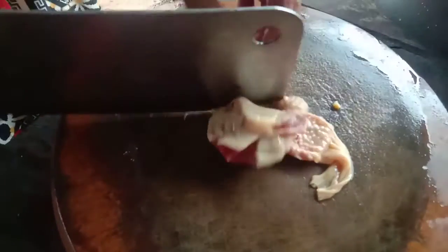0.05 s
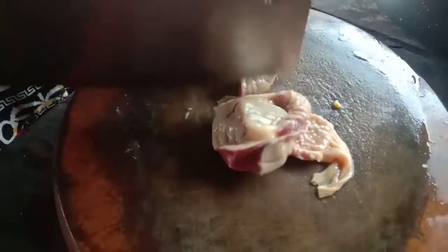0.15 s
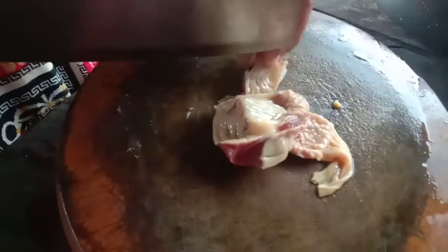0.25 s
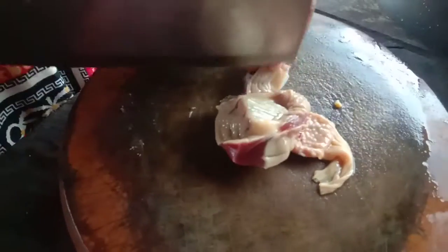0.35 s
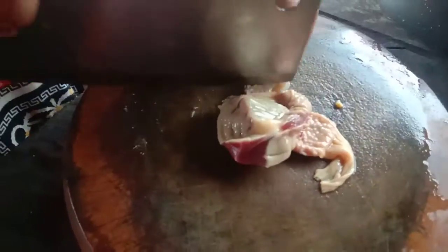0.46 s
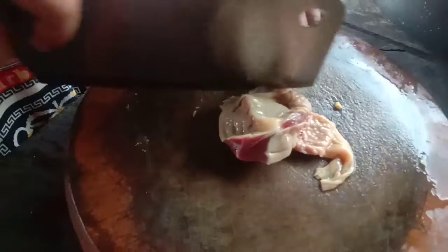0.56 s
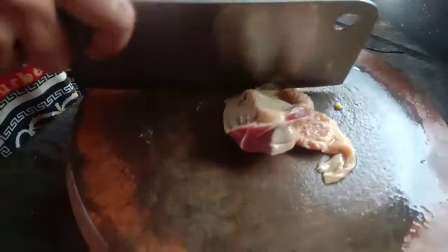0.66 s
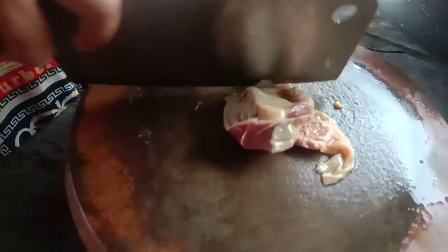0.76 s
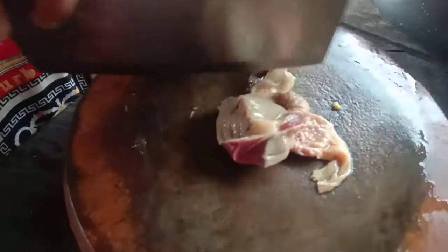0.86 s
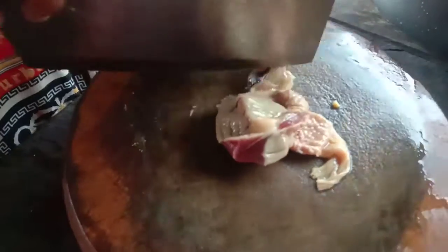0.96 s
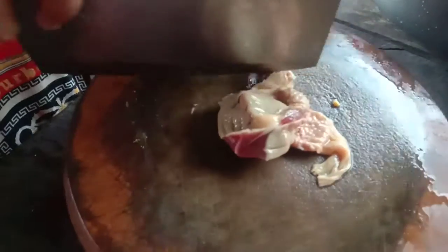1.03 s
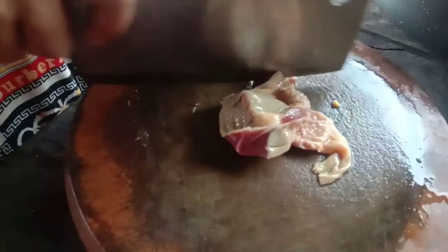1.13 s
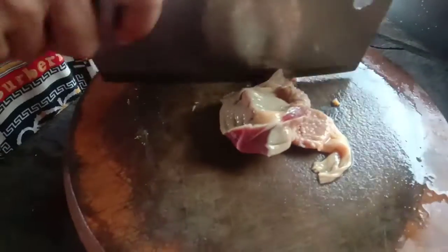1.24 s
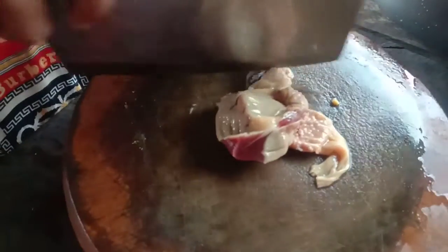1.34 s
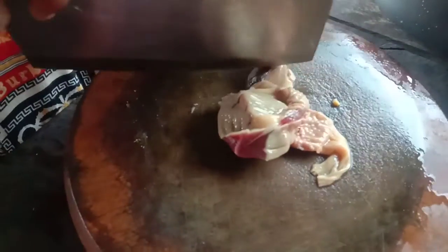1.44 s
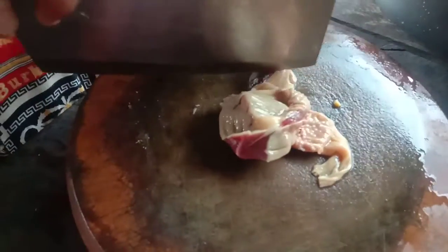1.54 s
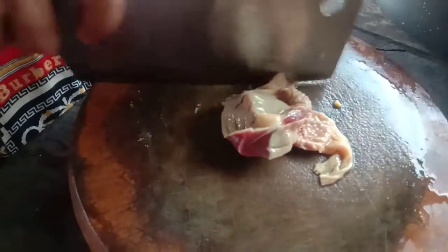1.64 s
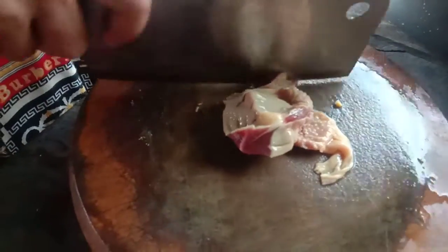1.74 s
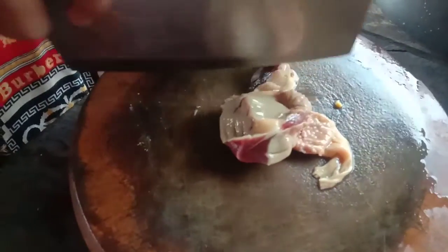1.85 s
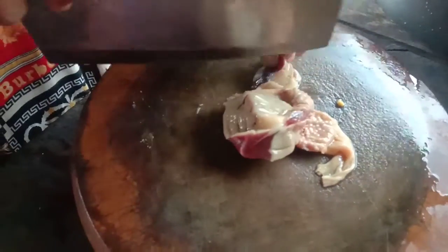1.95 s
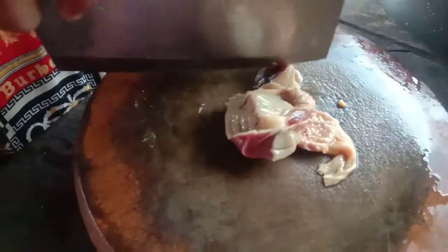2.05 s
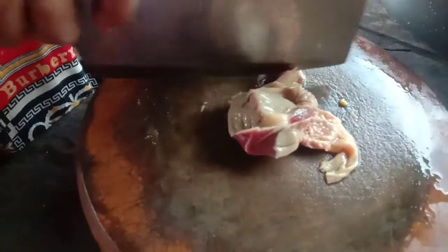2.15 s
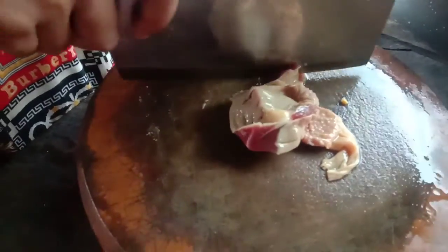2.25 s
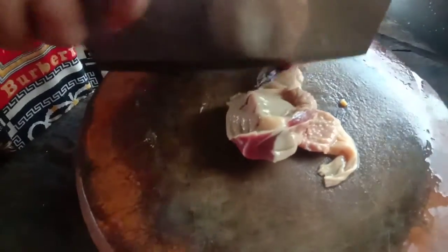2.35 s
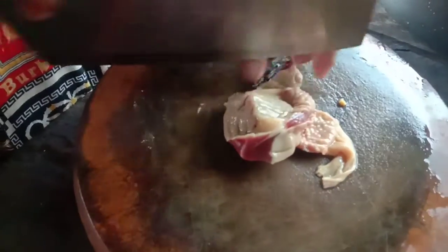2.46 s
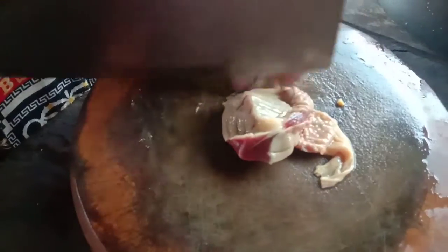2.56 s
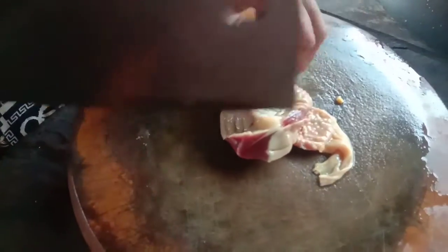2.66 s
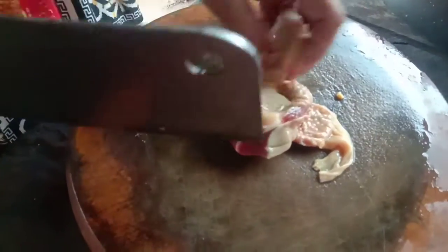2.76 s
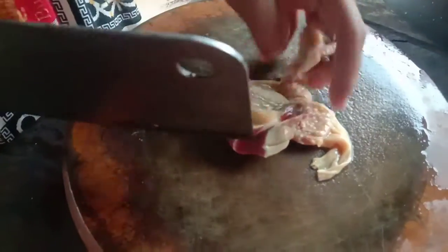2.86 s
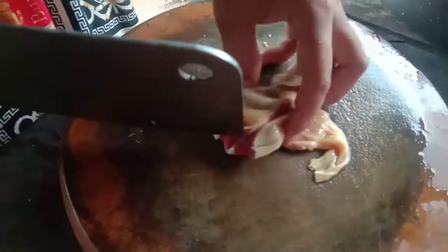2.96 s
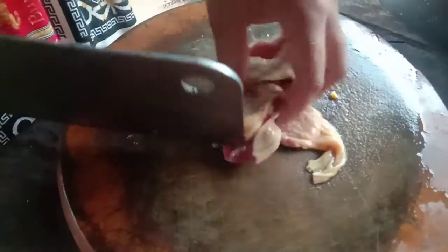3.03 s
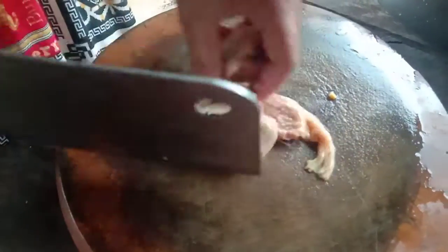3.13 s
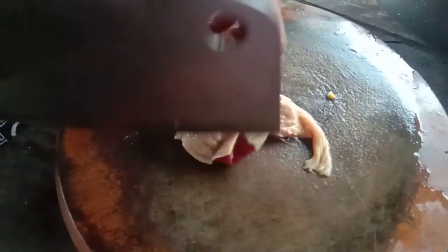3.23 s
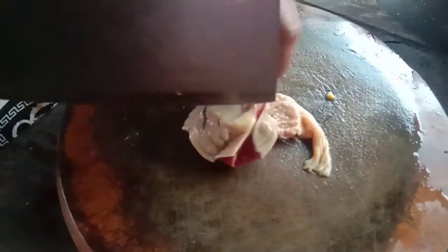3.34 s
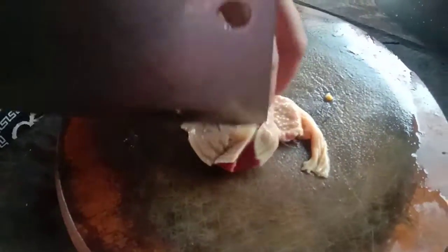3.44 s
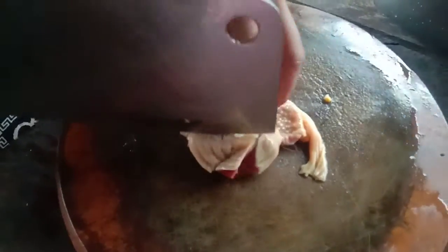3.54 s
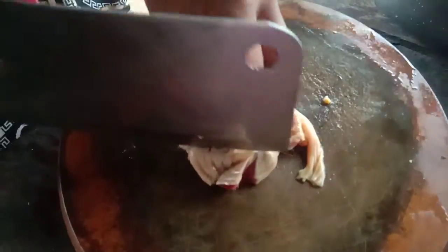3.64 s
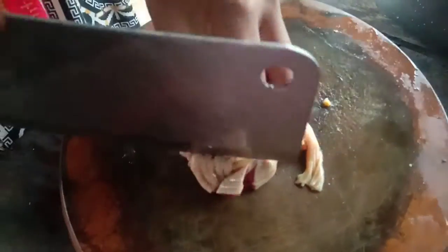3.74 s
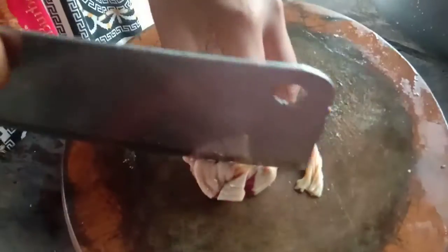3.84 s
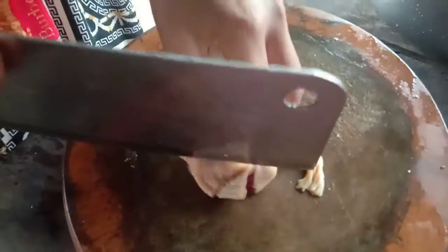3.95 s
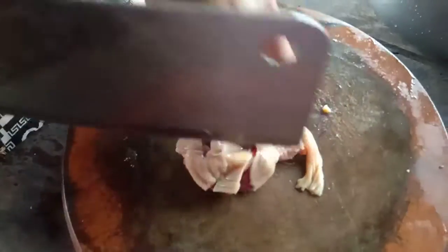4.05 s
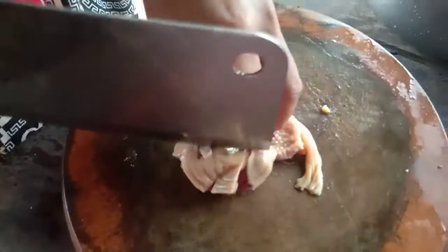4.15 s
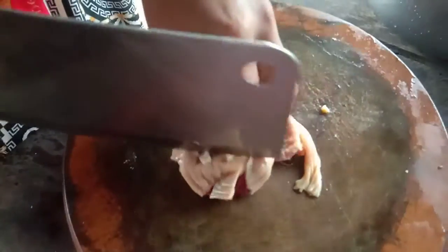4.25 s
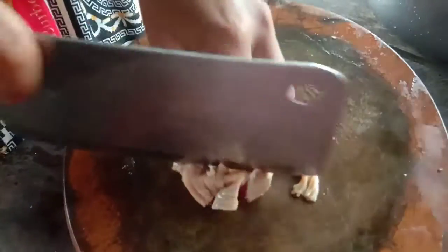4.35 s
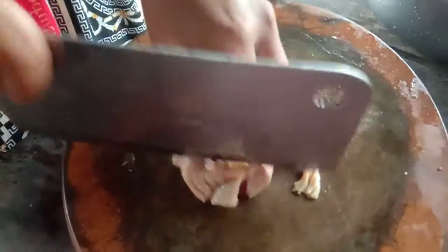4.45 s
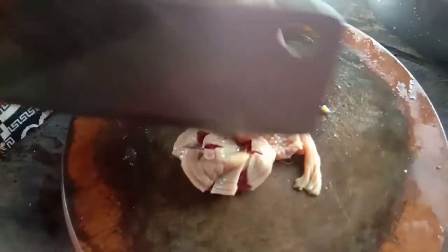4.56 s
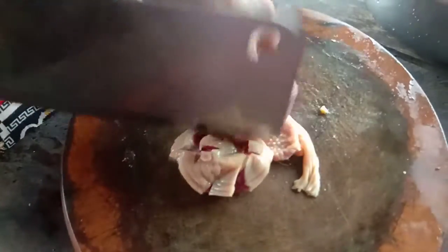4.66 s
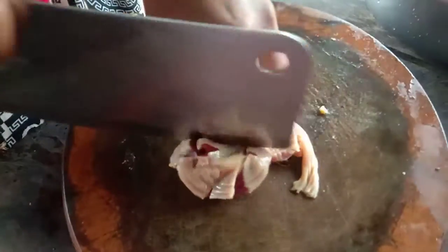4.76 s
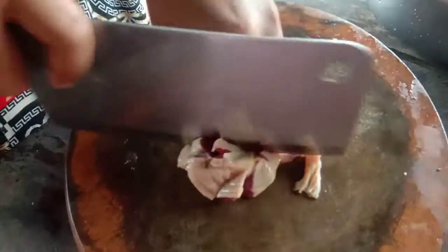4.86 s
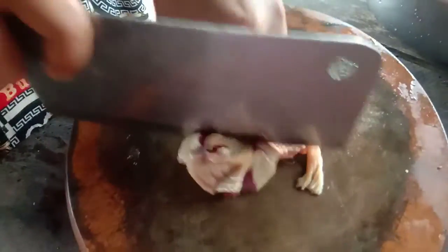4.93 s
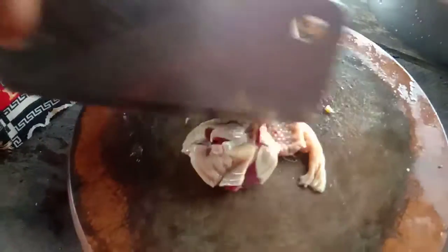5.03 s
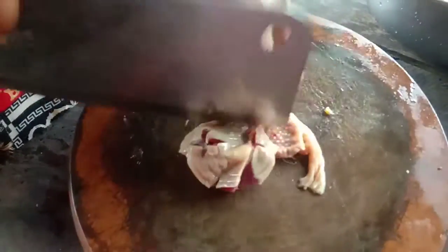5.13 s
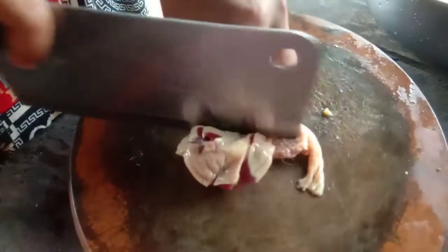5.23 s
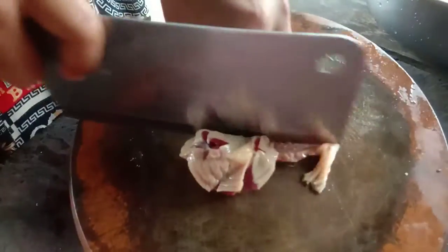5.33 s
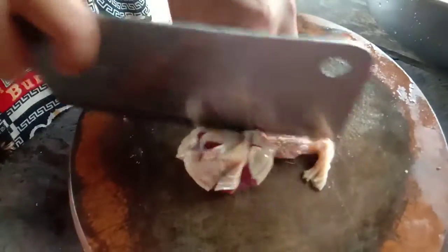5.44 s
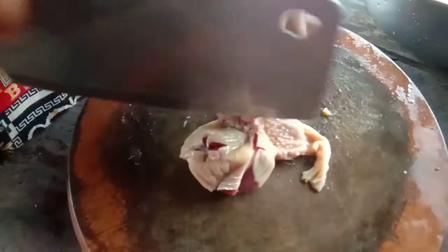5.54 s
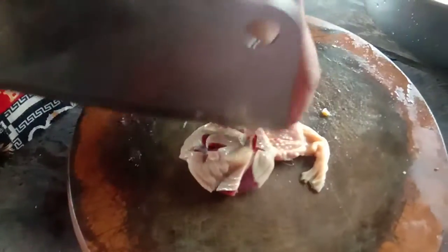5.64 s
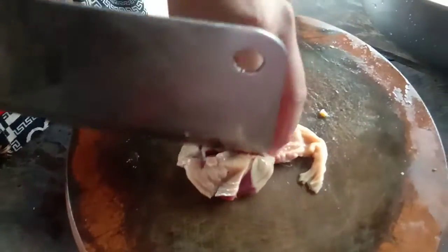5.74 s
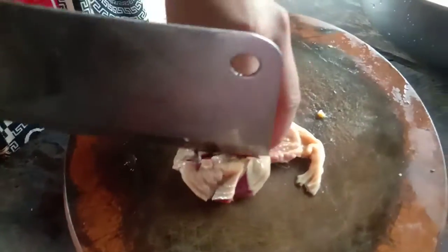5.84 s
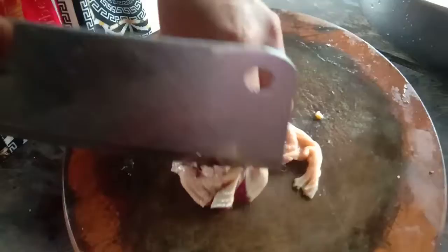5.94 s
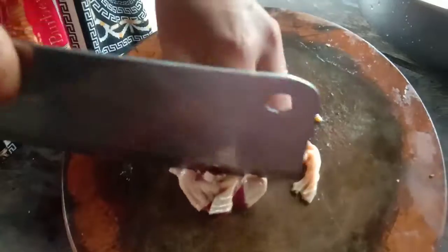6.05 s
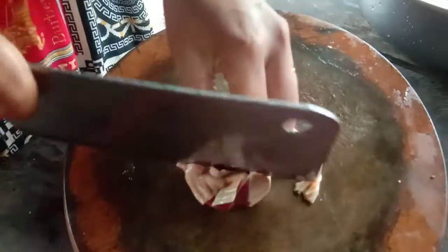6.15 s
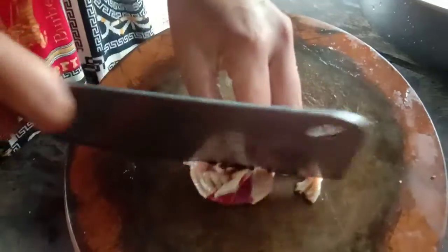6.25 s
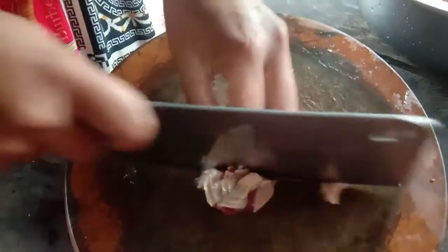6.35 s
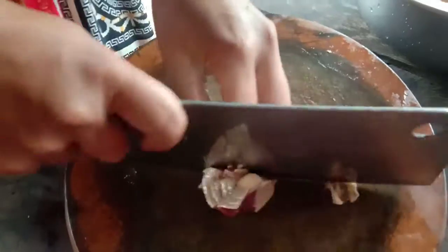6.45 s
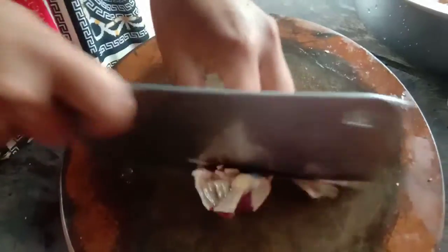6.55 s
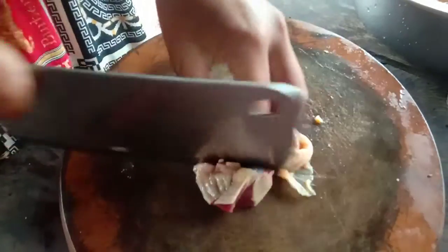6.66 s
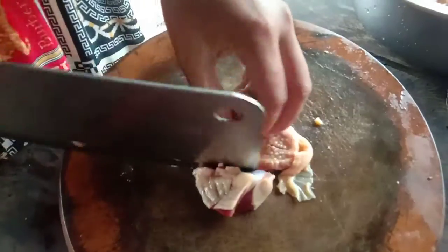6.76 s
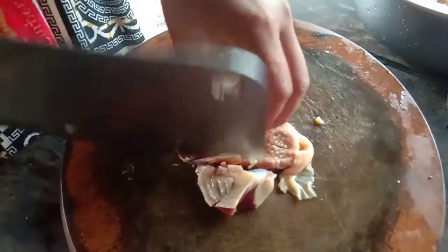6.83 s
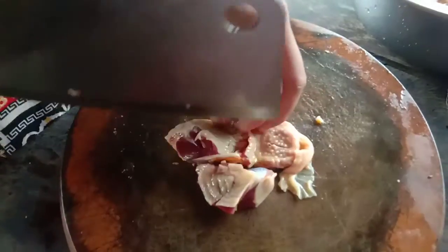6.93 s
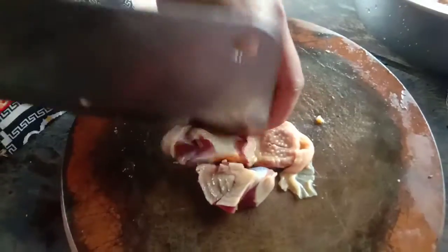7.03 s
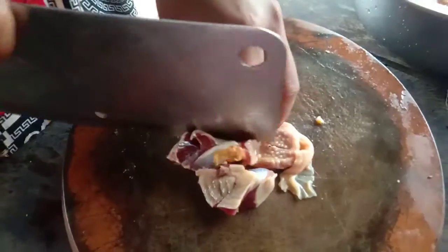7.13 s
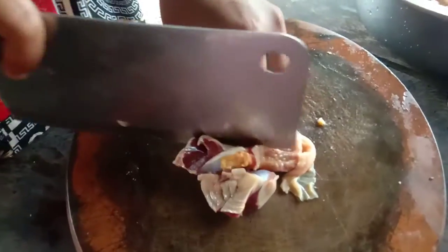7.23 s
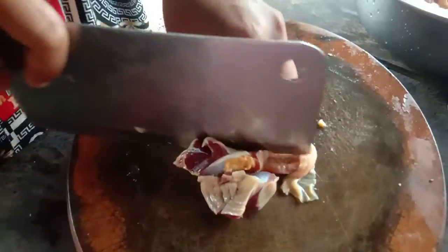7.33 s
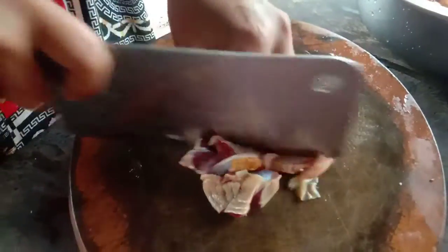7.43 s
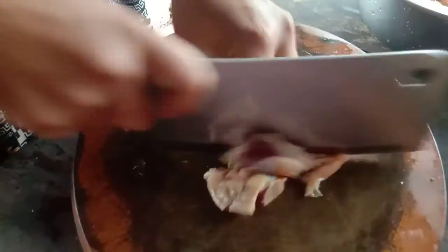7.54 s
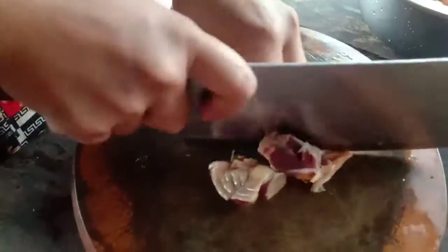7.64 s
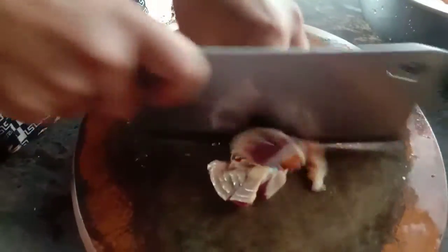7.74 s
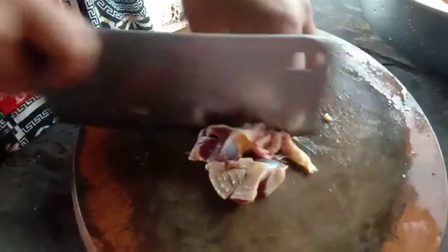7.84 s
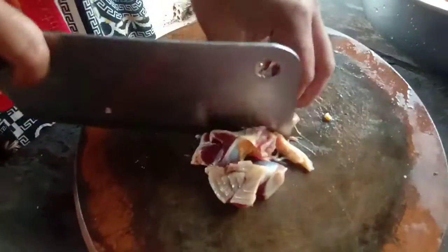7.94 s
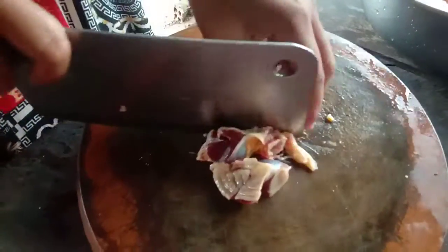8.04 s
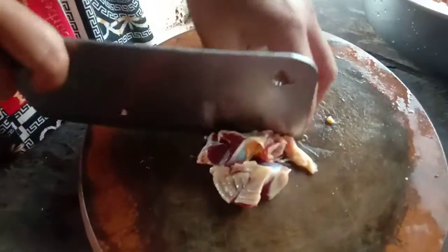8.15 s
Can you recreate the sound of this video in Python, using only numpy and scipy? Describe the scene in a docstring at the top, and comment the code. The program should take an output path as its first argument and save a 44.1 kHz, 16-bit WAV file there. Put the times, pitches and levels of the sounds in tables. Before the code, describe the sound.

Wet, fibrous cutting strokes with sharp cracks and a singing blade, loudest near the end, over thin insect chorus, a nearby chirper and faint engine.

```python
"""A shrill insect chorus and a far engine's soft thudding in open air, then a cleaver works through raw chicken.
The cutting is random clicks (tearing fibres) shaped by a spectrum and blade modes, swelling with each stroke.
Drags sing through narrow resonances, gristle snaps in volleys, the edge knocks on wood, wet meat slaps down.
A nearer insect chirps in two bouts of pulsed noise; a faint far call glides on wavering sines.
The engine is one windowed sine boom per firing with a drone; the chorus and the air are coloured noise."""
import sys
import numpy as np
from scipy import signal
from scipy.fft import rfft, irfft, next_fast_len
from scipy.io import wavfile
from scipy.ndimage import uniform_filter1d, map_coordinates

SR = 44100
rng = np.random.default_rng(int(sys.argv[2]) if len(sys.argv) > 2 else 0)


def master_out(mix):
    """Clip the mix to full scale and print it as 16-bit PCM to the path in sys.argv[1]."""
    frames = np.transpose(np.atleast_2d(mix))
    ceiling = np.clip(frames, -1, 1)
    pcm = np.round(ceiling * 32767).astype(np.int16)
    wavfile.write(sys.argv[1], SR, pcm)


N = 361179
T = np.arange(N) / SR

# Spectrum of wet meat. Each row: frequency in Hz, level in dB.
WET_SPECTRUM = [(120, -4), (270, -8.5), (700, -11), (1250, -2.5), (1700, -6.5), (2500, 2), (3900, -1),
                (6200, 4.5), (8200, -20), (13500, -27.5), (15200, -15)]


def undb(db):
    """Decibels to gain."""
    return 10 ** (np.asarray(db) / 20)


def unit(x):
    """Scale to rms 1."""
    return x / np.sqrt(np.mean(x ** 2))


def curve(rows, t=T):
    """The columns of a table, joined by straight lines in time."""
    s, *columns = np.transpose(rows)
    return [np.interp(t, s, c) for c in columns]


def add(out, start_s, x):
    """Mix x into out at a start time."""
    i = max(int(start_s * SR), 0)
    out[i:i + len(x)] += x[:max(N - i, 0)]


def colour(x, points):
    """Shape a sound by a spectrum of (Hz, dB) points, joined on a log frequency axis."""
    size = next_fast_len(len(x))
    hz, db = np.transpose(points)
    f = np.maximum(np.fft.rfftfreq(size, 1 / SR), 1)
    gain = undb(np.interp(np.log(f), np.log(hz), db))
    return irfft(rfft(x, size) * gain, size)[:len(x)]


def ring(x, hz, width_hz):
    """One resonance, gain 1 at its centre."""
    b, a = signal.iirpeak(hz, hz / width_hz, fs=SR)
    return signal.lfilter(b, a, x + 1e-18)  # the offset avoids denormals


def below(x, hz):
    """The part of a sound under a frequency, without delay."""
    return signal.sosfiltfilt(signal.butter(4, hz, fs=SR, output="sos"), x)


def walk(rate_hz):
    """Smooth random motion with a spread near 1: new targets at rate_hz, joined by a moving mean."""
    k = int(SR / rate_hz)
    steps = np.repeat(rng.standard_normal(N // k + 1), k)
    return 1.144 * uniform_filter1d(steps, k)[:N]


def crackle(size, rate_hz, spread_db):
    """Tiny random clicks, most weak and a few strong, at rms 1."""
    hits = rng.random(size) < rate_hz / SR
    clicks = hits * rng.standard_normal(size)
    return unit(clicks * undb(spread_db * np.minimum(rng.exponential(size=size), 4)))


def wander(x, depth_db, width_hz, rate_hz):
    """Peaks and dips of a given width come and go across the spectrum; the overall level is kept."""
    f, t, z = signal.stft(x, SR, nperseg=512, noverlap=384)
    place = np.meshgrid(f / width_hz, t * rate_hz, indexing="ij")
    field = map_coordinates(rng.standard_normal(size=(400, 500)), place, order=1, mode="nearest")
    y = signal.istft(z * undb(depth_db * field), SR, nperseg=512, noverlap=384)[1][:len(x)]
    return y * np.std(x) / np.std(y)


def chorus():
    """Many far insects merge into a shrill, slightly flickering band."""
    # Each row: frequency in Hz, level in dB.
    band = [(3800, -34), (4900, -23), (5400, -14), (5850, -9), (6350, 2), (6950, 4), (7400, -2),
            (7900, -21.5), (8600, -48), (10500, -23), (12500, -43.5), (15200, -29.5)]
    voices = wander(rng.standard_normal(N), depth_db=2.0, width_hz=140, rate_hz=13)
    level_db = -50.5 + .5 * walk(25)
    return unit(colour(voices, band)) * undb(level_db)


def engine():
    """Each firing of a slow single cylinder arrives as a soft boom; off load it runs deeper and less evenly."""
    # Each row: time in seconds, firings per second.
    firing_rate = [(0, 19.1), (1.05, 19.62), (2.1, 19.96), (3.1, 20.16), (3.6, 20.7), (4.1, 20.75),
                   (5.05, 20.6), (5.7, 19.65), (6.4, 19.1), (7, 18.2), (8.19, 17.4)]
    # Each row: time in seconds, boom level in dB, drone level in dB before its pulsing.
    levels = [(0, -56, -75.5), (1.2, -54.5, -77.5), (2.1, -50.5, -82), (2.9, -50, -70.5), (3.5, -58, -64),
              (4.3, -61, -70.5), (5.1, -58, -73.5), (5.78, -51, -67), (5.86, -57, -90), (6.85, -54, -114),
              (7.3, -64, -87), (8.19, -59.5, -88)]
    throttle_off_s, closing_s = 5.78, 0.069
    loaded_hz, idle_hz = 116.5, 91
    loaded_unevenness, idle_unevenness = 1, 5.5  # scales both timing and level spread

    rate_hz, = curve(firing_rate)
    boom_db, drone_db = curve(levels)
    idling = np.clip((T - throttle_off_s) / closing_s, 0, 1)
    boom_hz = loaded_hz + idling * (idle_hz - loaded_hz)
    unevenness = loaded_unevenness + idling * (idle_unevenness - loaded_unevenness)

    turns = np.cumsum(rate_hz) / SR + .12
    age_s = (turns % 1 - .5) / rate_hz  # from the middle of each boom
    late_s = 0.00014 * unevenness * walk(25)
    spread_s = np.where(age_s < 0, .008, .0105)  # builds faster than it dies
    boom = -np.sin(2 * np.pi * boom_hz * (age_s - late_s)) * np.exp(-(age_s / spread_s) ** 2)

    hum = unit(ring(ring(rng.standard_normal(N), 326.4, 5.6), 294, 46))
    drone = hum * (1 + .5 * np.cos(2 * np.pi * (turns - .7)))  # one pulse per firing
    # booms scattered by the surroundings
    rumble = unit(ring(ring(ring(rng.standard_normal(N), 110, 70), 111, 70), 135, 70))
    beat = undb(.6 * unevenness * walk(20)) * unit(boom) + undb(-19) * rumble
    return undb(boom_db) * beat + undb(drone_db) * drone


def air():
    """A soft, restless outdoor wash: noise with a wandering spectrum."""
    # Each row: frequency in Hz, level in dB.
    wash_spectrum = [(25, -11), (50, -2), (80, 21.5), (180, 10.5), (320, 8.5), (430, -0.5), (800, -3),
                     (1050, -4.5), (1250, 9), (1500, -2), (2100, -1), (2800, 1), (4000, 2), (6000, -3.5),
                     (9000, -22.5)]
    # Each row: time in seconds, level in dB.
    wash_level = [(0, -62), (2.8, -60), (3.6, -58.5), (5.3, -61), (5.9, -58.5), (8.19, -59)]
    wash = wander(rng.standard_normal(N), depth_db=4.5, width_hz=150, rate_hz=16)
    level_db, = curve(wash_level)
    return unit(colour(wash, wash_spectrum)) * undb(level_db + .5 * walk(9.8))


def side_noise():
    """Very faint coloured noise, in opposite phase left and right."""
    # Each row: frequency in Hz, level in dB.
    side_spectrum = [(25, -7), (110, -6), (219, -4), (903, -5), (1240, -1), (2130, -12), (6000, -19),
                     (10300, -54), (15000, -11)]
    side = undb(-80.5) * unit(colour(rng.standard_normal(N), side_spectrum))
    return side * np.array([[1], [-1]])


def neighbours():
    """Other chirpers answer faintly: steady narrow noise of uneven level."""
    hiss = unit(ring(ring(rng.standard_normal(N), 5000, 350), 4880, 500))
    return undb(-67.0 + 3.5 * walk(9)) * hiss


def push(age_s, rise_s, hold_s, fall_s):
    """Force on the blade: it builds, holds and lets go."""
    range_db = 24.5  # gained over the rise, lost over the fall
    bend = 1.3  # above 1: rounded near the top, breaking off faster at the ends
    away = np.maximum(-age_s / rise_s, 0) + np.maximum((age_s - hold_s) / fall_s, 0)
    return undb(-range_db * away ** bend)


def cutting():
    """Fibres tear in quick uneven slips and ring the blade; a keener bite adds treble."""
    # Each row: time of full force in seconds, force in dB before the trim, brightness in dB,
    # then rise, hold and fall in seconds.
    strokes = [ (0.513, -54, -1, 0.068, 0.054, .06), (0.773, -63.5, -33, .14, .01, 0.06),
               (1.031, -55, 3, 0.056, 0.084, 0.057), (1.246, -50, -21, 0.11, 0.016, .17),
               (1.442, -52.5, -31, 0.084, .005, 0.062), (1.573, -53, 2.5, 0.053, 0.011, 0.11),
               (2.06, -50.5, -3, 0.017, 0.067, 0.093), (4.247, -50, -8.5, 0.14, 0.043, 0.084),
               (4.758, -45.5, 1.5, 0.087, 0.013, 0.083), (5.266, -56, -2, .13, 0.028, 0.065),
               (6.204, -50.5, 5.5, 0.021, 0.1, 0.075), (6.31, -44, -9.5, 0.13, 0.058, .035),
               (6.482, -39, -7, 0.04, 0.035, 0.076), (6.538, -36.5, -8, 0.044, 0.038, 0.18),
               (7.367, -56, -2, 0.36, .05, .1), (7.474, -34, -9, 0.076, 0.0089, 0.1),
               (7.643, -44.5, -13, .015, 0.014, 0.05), (7.769, -53, -11, 0.19, 0.055, 0.058),
               (7.985, -53.5, -20, 0.054, .005, 0.034), ]
    # Tearing noise. Each row: frequency in Hz, level in dB.
    tear_spectrum = [(150, -31), (450, -7), (750, -13.5), (1200, 2.5), (1900, 2), (3600, 5), (4700, 9),
                     (6000, 5), (7100, 11), (8300, 1.5), (11000, 0.5), (13600, -7), (15200, 3.5)]
    # Blade modes damped by hand and meat. Each row: frequency in Hz, width in Hz, level in dB.
    blade_modes = [(1258, 42, 10), (1480, 34, -34), (2835, 43, 6.5), (4824, 22, 10.5), (5820, 75, 8),
                   (5590, 74, 10.5), (6134, 490, 8), (7200, 98, -14)]
    trim_db = -1.27

    fibres = crackle(N, rate_hz=6000, spread_db=2) * undb(1.7 * walk(130))
    fibres = wander(fibres, depth_db=6, width_hz=210, rate_hz=28)
    tearing = colour(fibres, tear_spectrum)
    sound = tearing + sum(undb(db) * ring(tearing, hz, width_hz) for hz, width_hz, db in blade_modes)

    body = below(sound, 3900)
    fizz = sound - below(sound, 8000)
    rasp = sound - body - fizz
    power = np.zeros((3, N))  # body, rasp, fizz
    for s, force_db, bright_db, rise_s, hold_s, fall_s in strokes:
        on = (T > s - 2 * rise_s) & (T < s + hold_s + 2 * fall_s)
        tilt = undb([0, 0.34 * bright_db, bright_db])  # the bite tilts the spectrum
        force = undb(force_db) * push(T[on] - s, rise_s, hold_s, fall_s)
        power[:, on] += np.outer(tilt, force) ** 2
    mix = np.sum(np.sqrt(power) * [body, rasp, fizz], axis=0)
    return mix * undb(trim_db) / np.std(body)


def drags():
    """Friction of the edge on bone or wood keeps one blade mode singing, and the board groans under it."""
    # Each row: centre in seconds, blade level in dB, blade pitch in Hz, board level in dB,
    # time from centre to 1/e in seconds.
    rubs = [(.535, -57.5, 1307, -81, 0.05), (1.098, -55, 1370, -67, 0.05), (2.57, -50, 1236, -69, .05),
            (4.285, -50, 3350, -67, .04), (4.766, -49, 2800, -72, 0.013), (6.338, -39, 1230, -49, 0.042),
            (6.46, -42.5, 1244, -68, 0.0079), (6.503, -43, 1203, -62, 0.023),
            (6.6, -56, 1220, -54.5, 0.063), (7.492, -51.5, 1080, -50.5, 0.065),
            (7.649, -47.5, 1104, -69, 0.014), (7.768, -47.5, 2850, -66, .008)]
    # Each row: frequency in Hz, level in dB.
    groan_spectrum = [(150, -10), (330, -11.5), (480, 5), (780, 0), (1050, -5), (2000, -44)]
    out = np.zeros(N)
    friction = wander(rng.standard_normal(N), depth_db=11, width_hz=119, rate_hz=23)
    groan = unit(colour(friction, groan_spectrum))
    for s, blade_db, hz, board_db, length_s in rubs:
        tone = unit(ring(ring(rng.standard_normal(N), hz, 60), hz, 120))
        out += (undb(blade_db) * tone + undb(board_db) * groan) * np.exp(-((T - s) / length_s) ** 2)
    return out


def snaps():
    """Gristle and small bones: each snap is a short volley of cracks through one broad resonance."""
    # Each row: start in seconds, peak in dB, pitch in Hz, length in seconds (envelope down to 1/e squared).
    breaks = [(1.182, -27.5, 5900, 0.0026), (1.574, -28, 7360, .01), (1.5823, -21.5, 6300, .007),
              (1.716, -21, 6000, 0.012), (4.896, -30, 6500, 0.0055), (5.122, -30, 5740, .005),
              (6.2, -32.5, 6000, 0.0096), (6.273, -20, 6150, 0.012), (6.299, -25.5, 6000, .012),
              (6.482, -17, 5730, 0.02), (6.538, -21, 6340, .025), (6.554, -13, 6100, 0.023),
              (7.434, -22.5, 4630, .018), (7.471, -11.5, 6730, 0.011), (7.639, -22.5, 5200, 0.035),
              (8.156, -36, 7800, .006)]
    out, t = np.zeros(N), T[:SR // 10]
    for s, peak_db, hz, length_s in breaks:
        cracks = crackle(len(t), rate_hz=9000, spread_db=6.5) * np.exp(-2 * t / length_s)
        resonant = ring(ring(cracks, hz, 1300), hz, 4200)
        x = resonant + undb(-18) * (cracks - below(cracks, 1360))
        add(out, s, undb(peak_db) * x / np.abs(x).max())
    return out


def knocks():
    """A brief contact on bone or board rings the blade and, through the meat, thumps the board."""
    # Each row: start in seconds, blade ring in dB, ring pitch in Hz, board thud in dB.
    hits = [(1.206, -41, 1264, -57), (1.587, -32, 1350, -39.5), (2.943, -47.5, 2100, -73),
            (4.891, -42, 1840, -74), (6.289, -55, 1210, -44.5), (7.99, -40.5, 1250, -60)]
    # Each row: frequency in Hz, width in Hz, level in dB.
    board_modes = [(95, 20, 3.5), (133, 21, -1), (250, 76, 4), (432, 61, -6.5)]
    out, t = np.zeros(N), T[:SR // 4]
    no_bass = signal.butter(4, 72, "high", fs=SR, output="sos")  # a small board radiates no deep bass
    for s, ring_db, hz, thud_db in hits:
        tone = np.sin(2 * np.pi * hz * t) * np.exp(-t / 0.0051)
        contact = colour(rng.standard_normal(len(t)), WET_SPECTRUM) * np.exp(-t / .005)
        thud = sum(undb(db) * np.sin(2 * np.pi * f * t) * np.exp(-np.pi * width_hz * t)
                   for f, width_hz, db in board_modes)
        thud = signal.sosfilt(no_bass, thud)
        add(out, s, undb(ring_db) * (tone + undb(-1.5) * contact) + undb(thud_db) * thud)
    return out


def slaps():
    """Wet meat lands with a spatter whose treble dies first; small pockets in it resonate briefly."""
    # Each row: start in seconds, level in dB, time for the low part to fall 60 dB in seconds.
    landings = [(1.26, -45, 0.4), (2.508, -30, 0.44), (4.26, -61, 0.28), (5.809, -46.5, 0.67),
                (6.804, -43.5, 0.61), (6.964, -51.5, 0.31)]
    out, t = np.zeros(N), T[:SR // 2]
    for s, db, t60_s in landings:
        drops = crackle(len(t), rate_hz=4000, spread_db=2)
        drops = wander(drops, depth_db=5, width_hz=260, rate_hz=40)
        spatter = unit(colour(drops, WET_SPECTRUM))
        low = below(spatter, 3050)
        high = spatter - low
        fade_db = -60 * t / t60_s
        onset = 1 - np.exp(-t / 0.0023)
        add(out, s, undb(db) * onset * (low * undb(fade_db) + high * undb(2.54 * fade_db)))
    return out


def chirps():
    """Loudness of the near insect: within a bout the gap between chirps grows a little each time."""
    # Each row: first chirp in seconds, end in seconds, level in dB before the chirper's trim.
    bouts = [(1.681, 3.5, -40), (5.835, 6.4, -38.5)]
    first_period_s, slowing_s = .2298, .0036
    onset_s, peak_s, half_s = 0.0059, 0.084, 0.087  # a quick start, then a rounded swell
    swell, age_s = np.zeros(N), T[:SR // 3]
    shape = (1 - np.exp(-age_s / onset_s)) * np.exp(-((age_s - peak_s) / half_s) ** 2)
    for s, end_s, db in bouts:
        period_s = first_period_s
        while s < end_s:
            add(swell, s, undb(db) * shape)
            s += period_s
            period_s += slowing_s
    return swell


def chirper():
    """A near insect: each chirp is a run of uneven wing strokes on a narrow resonance."""
    trim_db = -5
    wing_cycles = np.cumsum(58 * (1 + 0.263 * walk(40))) / SR  # about 58 strokes per second
    flutter = undb(3.2 * np.cos(2 * np.pi * wing_cycles) + 1.2 * walk(70))
    teeth = rng.standard_normal(N) * flutter
    song = signal.sosfilt(signal.butter(3, [4500, 4900], "band", fs=SR, output="sos"), teeth)
    return chirps() * undb(trim_db) * unit(song)


def far_call():
    """Thin gliding notes that waver in pitch and level, blurred by distance."""
    # Each row: start in seconds, length in seconds, first pitch in Hz, last pitch in Hz,
    # level in dB before the trim.
    notes = [(3.296, .2, 1575, 1790, -58), (3.558, 0.59, 1720, 1490, -65), (4.27, 0.9, 1530, 1524, -64),
             (5.428, .36, 1255, 1375, -59.5), (5.805, 0.3, 1280, 1442, -57.5)]
    fade_s, trim_db = 0.058, -2.5
    out = np.zeros(N)
    jitter = .016 * walk(160)
    waver_db = 3 * walk(30)
    for s, length_s, first_hz, last_hz, db in notes:
        on = (T > s) & (T < s + length_s)
        age_s = T[on] - s
        glide_hz = first_hz + (last_hz - first_hz) * age_s / length_s
        hz = glide_hz * (1 + jitter[on])
        fade = np.clip(np.minimum(age_s, length_s - age_s) / fade_s, 0, 1)
        tone = unit(np.sin(2 * np.pi * np.cumsum(hz) / SR))
        out[on] += tone * fade * undb(db + trim_db + waver_db[on])
    return out


def scene():
    """Everything sits in the centre; only a very faint noise is wide."""
    surroundings = chorus() + engine() + air() + neighbours() + chirper() + far_call()
    butchery = cutting() + drags() + snaps() + knocks() + slaps()
    return surroundings + butchery + side_noise()


def record(dry):
    """A steep low-pass removes the top of the spectrum."""
    top_hz = 15650
    return signal.sosfiltfilt(signal.ellip(10, .1, 60, top_hz, fs=SR, output="sos"), dry)


dry = scene()
out = record(dry)
master_out(out)
```